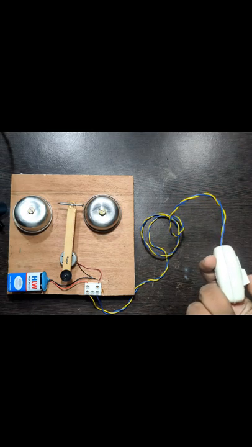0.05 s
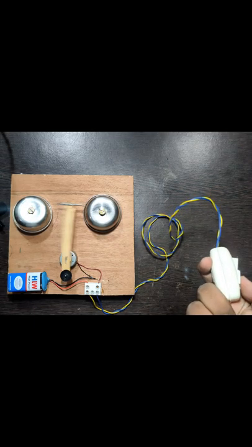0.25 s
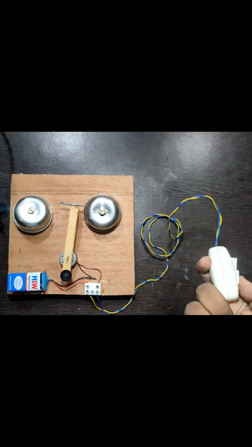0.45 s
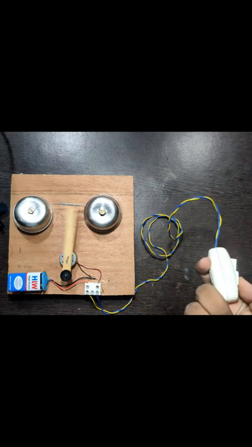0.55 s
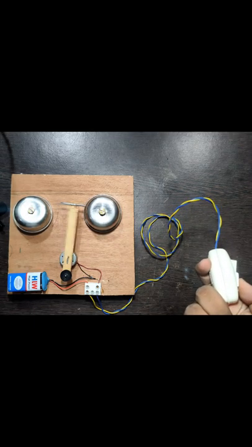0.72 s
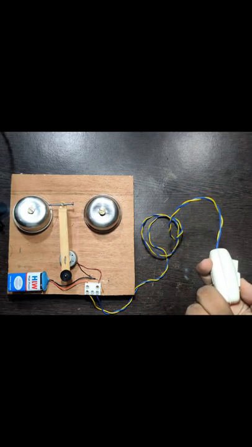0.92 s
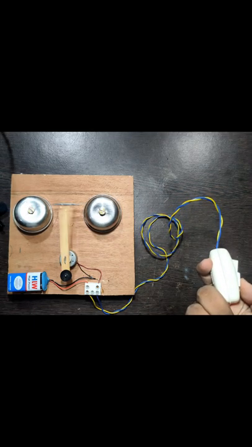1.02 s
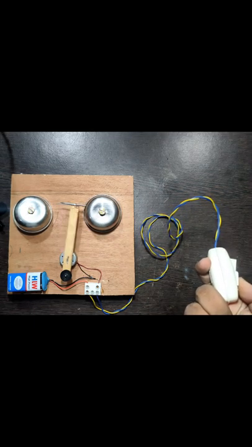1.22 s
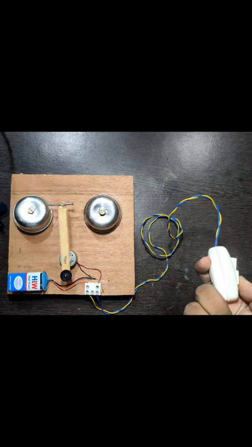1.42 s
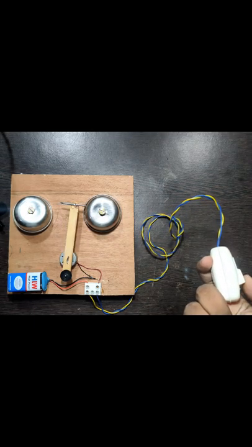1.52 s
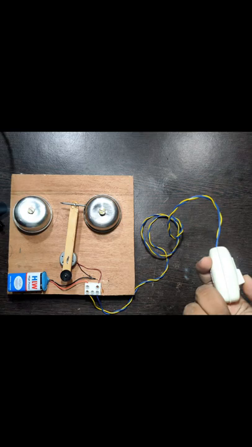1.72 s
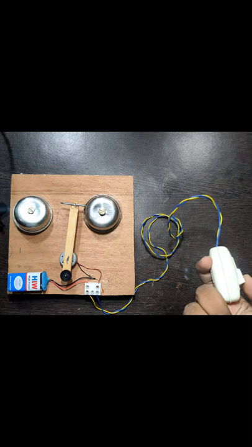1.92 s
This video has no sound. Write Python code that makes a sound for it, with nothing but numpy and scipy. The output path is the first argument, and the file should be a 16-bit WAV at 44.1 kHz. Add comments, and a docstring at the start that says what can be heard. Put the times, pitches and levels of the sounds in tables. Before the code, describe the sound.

A small motor-driven bell rattles rapidly on two steel domes between two switch clicks.

```python
"""Home-made electric bell

A switch clicks on and a small motor throws a wooden arm to and fro about twelve times a second.
Its wire tip clatters on two steel bells in turn while the loose arm knocks and rattles and the
wooden board bumps on the table. The switch clicks off. Heard close by in a small room."""
import sys
import numpy as np
from scipy import signal
from scipy.fft import rfft, irfft
from scipy.io import wavfile
from scipy.ndimage import uniform_filter1d

SR = 44100
rng = np.random.default_rng(int(sys.argv[2]) if len(sys.argv) > 2 else 0)


def dump_mix(stems):
    """Bounce the given channels to the path in sys.argv[1] as a 16-bit WAV at rate SR."""
    frames = np.atleast_2d(stems).T  # one column per channel
    limited = np.clip(frames, -1, 1)  # hard clip at full scale
    pcm = np.round(limited * 32767).astype(np.int16)
    wavfile.write(sys.argv[1], SR, pcm)


N = 85995
TIME_S = np.arange(N) / SR
BIN_HZ = np.fft.rfftfreq(2 * N, 1 / SR)


def amp(db):
    """Decibels to gain."""
    return 10 ** (np.asarray(db) / 20)


def unit(x):
    """Scales each channel to unit energy."""
    return x / np.sqrt(np.sum(x ** 2, -1, keepdims=True) + 1e-20)


def read(points, hz):
    """Interpolates a table on a log-frequency axis."""
    freq_hz, value = np.transpose(points)
    return np.interp(np.log(hz + 1), np.log(freq_hz + 1), value)


def add(mix, start_s, sound):
    """Mixes a sound in at start_s."""
    part = mix[..., round(start_s * SR):][..., :sound.shape[-1]]
    part += sound[..., :part.shape[-1]]


def convolve(x, response):
    """Convolves per channel, cut to N samples."""
    return signal.fftconvolve(np.atleast_2d(x), np.atleast_2d(response), axes=1)[:, :N]


def butter(x, order, cutoff_hz, kind):
    """Butterworth filter."""
    return signal.sosfilt(signal.butter(order, cutoff_hz, kind, fs=SR, output="sos"), x)


def colour(points, size=4096):
    """Causal unit-energy response with the given spectrum."""
    log_gain = np.log(amp(read(points, abs(np.fft.fftfreq(size, 1 / SR)))))
    spectrum = np.exp(np.conj(signal.hilbert(log_gain)))
    return unit(np.fft.ifft(spectrum).real[:size // 2])


def ring(modes):
    """Decaying partials, each with its own phase left and right."""
    t = np.arange(SR) / SR
    out = np.zeros((2, SR))
    for hz, level_db, t60_s in modes:
        phase = rng.normal(0, 0.75, (2, 1)) * min(hz / 4000, 2)
        energy_norm = np.sqrt(4 * np.log(1000) / (t60_s * SR))
        out += amp(level_db - 60 * t / t60_s) * energy_norm * np.sin(2 * np.pi * hz * t + phase)
    return out


def sparse_noise(shape, density):
    """Random impulses on a fraction of the samples."""
    return rng.standard_normal(shape) * (rng.random(shape) < density)


def burst(decay_s, density=1, size=3000):
    """Decaying spray of tiny contacts."""
    return unit(sparse_noise(size, density) * np.exp(-np.arange(size) / SR / decay_s))


# freq_hz, level_db, t60_s
WIRE_MODES = [(8100, -4, .008), (10700, -2, .009), (13400, 2, .01)]
BOUNCE_S, CHATTER_S = 0.0024, 0.0018
WIRE_DB, SPOT_SPREAD_DB = -9, 2


def bell(blows, crack_colour, modes, crack_db, ring_db, contact_s, bounce_db, chatter_db):
    """Wire hits, bounces and chatters on a tightly screwed bell; each spot rings differently."""
    force, spots = np.zeros((2, N)), np.zeros((4, N))
    for start_s, level_db in blows:
        rebound_s = start_s + BOUNCE_S * rng.uniform(0.92, 1.08)
        add(spots[rng.integers(len(spots))], rng.uniform(start_s, rebound_s), amp([level_db]))
        for side in force:
            add(side, start_s, amp(level_db) * burst(contact_s))
            add(side, rebound_s, amp(level_db + bounce_db) * burst(contact_s))
            add(side, start_s, amp(level_db + chatter_db) * burst(CHATTER_S, density=0.055))
    cracks = convolve(force, colour(crack_colour)) + amp(WIRE_DB) * convolve(force, ring(WIRE_MODES))
    tone = np.zeros((2, N))
    for impulses in spots:
        spot_modes = [(hz, db + rng.normal(0, SPOT_SPREAD_DB), t60_s) for hz, db, t60_s in modes]
        tone += convolve(impulses, ring(spot_modes))
    return amp(crack_db) * cracks, amp(ring_db) * tone


# start_s, level_db
FIRST_BLOWS = [(0.2904, -10.5), (0.3334, -7.5), (0.412, -2.5), (0.5059, -5), (.592, -6.5), (0.675, -2.5),
               (.767, -6), (0.8506, -4), (0.9358, -7.5), (1.016, -3), (1.105, -8), (1.1877, -4.5),
               (1.273, -3), (1.359, -6.5), (1.439, -3), (1.522, -5.5)]
# wire on steel: freq_hz, level_db
FIRST_CRACK_COLOUR = [(300, -22), (1070, -6), (1200, 1), (2050, 4.5), (2550, 2), (3300, 2.5), (4150, 0),
                      (4900, 6), (6100, -2.5), (7300, -1), (8000, 6), (9000, 1), (9900, -18), (10750, 6),
                      (11750, -20), (12200, -36), (12700, -2), (13400, 5.5), (14400, -22), (15200, -50),
                      (16000, -16.5)]
# freq_hz, level_db, t60_s
FIRST_MODES = [(1883, -4, .16), (2543, -12, .2), (3021, -4, .2), (4932, -12, .13), (5469, -8, .15),
               (6196, -14, .16), (6815, -14, .16), (7949, -6, .14), (9911, -16, .16), (10562, -9, .1),
               (10707, -4, .11), (13222, -6, .12), (13378, 0, .2), (13927, -10, .12), (14438, -18, .12)]


def first_bell():
    """Forward swing: short contact, strong bounce. Returns cracks and ring."""
    return bell(FIRST_BLOWS, FIRST_CRACK_COLOUR, FIRST_MODES, crack_db=-2, ring_db=-9,
                contact_s=0.00094, bounce_db=1, chatter_db=-4)


def ting(gain_db=-3, growth=2.9, decay_s=0.0008):
    """Sharp edge of hit and bounce on the first bell; harder blows are brighter."""
    out = np.zeros((2, N))
    for start_s, level_db in FIRST_BLOWS:
        for hit_s in (start_s, start_s + BOUNCE_S):
            add(out, hit_s, amp(gain_db + growth * level_db) * np.array([burst(decay_s), burst(decay_s)]))
    return butter(out, 1, 12000, "high")


def hum(pitch_hz=1167, t60_s=0.95, rms_db=-50.5):
    """The first bell's lowest partial, topped up by every blow, lingers after the last."""
    power = sum((TIME_S > start_s) * amp(level_db - 60 * abs(TIME_S - start_s) / t60_s) ** 2
                for start_s, level_db in FIRST_BLOWS)
    envelope = np.sqrt(abs(uniform_filter1d(power, 200)))
    return amp(rms_db) * np.sqrt(N) * unit(envelope * np.sin(2 * np.pi * pitch_hz * TIME_S))


# start_s, level_db
SECOND_BLOWS = [(.369, -5), (.461, -1), (.5465, -2.5), (.632, -3), (.719, -1.5), (.809, -2.5), (.890, -1),
                (.975, -5), (1.0587, 1), (1.148, -3.5), (1.229, -2), (1.3125, 0), (1.396, -4.5),
                (1.478, -2.5), (1.562, -4)]
# wire on steel: freq_hz, level_db
SECOND_CRACK_COLOUR = [(300, -22), (1070, -9), (1200, -7), (2050, 4.5), (2550, 6), (3300, 7.5),
                       (4150, -9.5), (5400, 8.5), (6300, -0.5), (7300, -5.5), (8200, 0.5), (9300, 6),
                       (10200, -1), (10900, 6), (12000, -52), (13400, 11.5), (14300, 0), (15200, -38),
                       (16000, -17)]
# freq_hz, level_db, t60_s
SECOND_MODES = [(1255, -11, .2), (3677, -9, .35), (4732, -8, .22), (8336, -8, .16), (9162, -12, .18),
                (13438, 0, .22), (13554, -6, .12)]


def second_bell():
    """Back swing: longer contact, weaker bounce. Returns cracks and ring."""
    return bell(SECOND_BLOWS, SECOND_CRACK_COLOUR, SECOND_MODES, crack_db=-5.5, ring_db=-11,
                contact_s=0.0019, bounce_db=-5.5, chatter_db=-3.5)


# arm rebounds: time_s, level_db
KNOCKS = [(0.305, -15), (.338, 4), (0.361, -4.5), (.425, -0.5), (.461, -8.5), (0.514, 0), (.543, -1),
          (0.6, 0), (0.612, -17), (0.638, 0), (.685, -0.5), (0.714, -10), (0.729, -16), (0.774, 2.5),
          (.80, -4), (.812, -7.5), (0.861, 1.5), (0.886, -4), (0.941, 6.5), (0.965, 0), (1.024, 3),
          (1.062, -4), (1.113, 3.5), (1.122, -4), (1.136, 0.5), (1.155, -2.5), (1.197, 3.5), (1.228, -0.5),
          (1.237, -10), (1.279, 1.5), (1.308, -1.5), (1.366, 4.5), (1.389, 1), (1.449, 3.5), (1.474, 0),
          (1.53, 4.5), (1.556, -4), (1.569, -3)]
# arm and board resonances: freq_hz
ARM_MODE_HZ = [1175, 1255, 1413, 1498, 1607, 1750, 1884, 1975, 2158, 3005, 3500]
# same order: level_db, t60_s
ARM_MODE_DECAYS = [(-18, 0.088), (-1, 0.061), (-0.5, 0.022), (-3, 0.023), (-6.5, 0.016), (-5, 0.027),
                   (0, 0.039), (0, 0.033), (-10.5, 0.071), (-5.5, 0.031), (-5.5, 0.017)]
KNOCK_LEAD_S, KNOCK_RISE_S, KNOCK_DAMPING_S = 0.003017, 0.0056, 0.0077


def arm(knock_db=-5, spread_db=5.5, rattle_db=-47, rattles_per_s=510):
    """The loose arm knocks after the blows and rattles between; each knock rings differently."""
    modes = np.column_stack([ARM_MODE_HZ, ARM_MODE_DECAYS])
    contacts = unit(sparse_noise(N, rattles_per_s / SR)) * np.sqrt(N)
    out = convolve(amp(rattle_db) * contacts * rattle_envelope(), ring(modes))
    t = np.arange(4000) / SR
    hz, mode_db, t60_s = modes.T[:, :, None]
    swell = (1 - np.exp(-(t / KNOCK_RISE_S) ** 2)) * np.exp(-t / KNOCK_DAMPING_S)
    for time_s, level_db in KNOCKS:
        jitter_db, phase = rng.normal(0, spread_db, hz.shape), rng.random(hz.shape)
        partials = amp(mode_db + jitter_db - 60 * t / t60_s) * np.sin(2 * np.pi * (hz * t + phase))
        add(out, time_s - KNOCK_LEAD_S, amp(knock_db + level_db) * unit(swell * partials.sum(0)))
    return butter(out, 6, 1100, "high")


# start_s, level_db, pitch_hz, snap_db, left_minus_right_db, case_db, peak_s
SWITCH_CLICKS = [(0.2425, -8, 2960, -13, -1, -20, 0.00065), (1.6031, -3, 3380, -5, 5, -41, 0.00065)]
# freq_hz, level_db
SNAP_COLOUR = [(300, -13), (1400, -8), (2200, -21), (3000, 7), (3700, 0), (4400, 7), (5400, -18),
               (6500, 3.5), (7500, -8.5), (8500, 10), (9800, -6), (11000, 2.5), (12500, -10), (13800, -13),
               (15500, 3)]


def switch(gain_db=6, right_lead_s=0.0003, snap_s=0.00075, case_hz=1444, case_t60_s=0.015):
    """The rocker snaps over: a few cycles of its plastic case and a bright crack that fills the room."""
    near, bright = np.zeros((2, N)), np.zeros((2, N))
    t = np.arange(3000) / SR
    for start_s, level_db, pitch_hz, snap_db, pan_db, case_db, peak_s in SWITCH_CLICKS:
        gain = amp(gain_db + level_db + np.array([[pan_db], [-pan_db]]) / 2)
        click = unit((t / peak_s) ** 3 * np.exp(-3 * t / peak_s) * np.sin(2 * np.pi * pitch_hz * t))
        add(near[0], start_s, gain[0] * click)
        add(near[1], start_s - right_lead_s, gain[1] * click)
        snap = unit(convolve([burst(snap_s), burst(snap_s)], colour(SNAP_COLOUR)))
        add(bright, start_s, gain * amp(snap_db) * snap)
        add(bright, start_s, gain * ring([(case_hz, case_db, case_t60_s)]))
    clicks = room(near, tail_db=-5, early_db=-10, echo_db=-14)
    return clicks + room(bright, tail_db=3, early_db=3.5, echo_db=1.5)


# freq_hz, level_db
SCRAPE_COLOUR = [(200, -50), (1080, -18), (1180, 9), (1950, 11.5), (2450, 2.5), (3550, 7.5), (4150, -39),
                 (5300, 8.5), (7300, 2.5), (8100, 11), (9800, -2.5), (10800, -9), (12000, -41), (13400, 14),
                 (14400, 16), (16000, -48)]
# freq_hz, level_db
RUMBLE_COLOUR = [(25, -21), (70, -18), (130, -7), (190, -1), (280, -1.5), (420, 0.5), (700, -2), (1000, -6),
                 (1600, -4), (4000, -62)]


def motor(scrape_db=-40, rumble_db=-45.5):
    """Motor and pivot scrape grittily; the board rumbles beneath."""
    grit = sparse_noise((4, N), 0.06)  # left, right, two shared
    scrape = unit(convolve(grit[:2] + 0.5 * grit[2], colour(SCRAPE_COLOUR))) * rattle_envelope()
    rumble = unit(convolve(0.33 * grit[:2] + grit[3], colour(RUMBLE_COLOUR))) * motor_speed()
    return np.sqrt(N) * (amp(scrape_db) * scrape + amp(rumble_db) * rumble)


def motor_speed(on_s=0.286, off_s=1.575, spin_s=0.0064, coast_s=0.0046):
    """Spins up, holds at 1, coasts to rest."""
    return np.clip((TIME_S - on_s) / spin_s, 0, 1) * np.exp(-np.maximum(TIME_S - off_s, 0) / coast_s)


def rattle_envelope(lull_db=-11.5, lead_s=0.014, width_s=0.0077):
    """The running mechanism falls quiet as the arm flies toward the first bell."""
    flight = sum(np.exp(-((TIME_S - start_s + lead_s) / width_s) ** 2) for start_s, _ in FIRST_BLOWS)
    return motor_speed() * amp(lull_db * flight)


# start_s, level_db
BUMPS = [(0.661, 1), (0.869, -1), (0.924, 5), (1.042, 3), (1.227, 11.5)]


def bumps(gain_db=-30):
    """The shaking board bumps softly on the table."""
    out = np.zeros(N)
    for start_s, level_db in BUMPS:
        thud = unit(butter(burst(decay_s=0.011), 3, 110, "low"))
        add(out, start_s, amp(gain_db + level_db) * thud)
    return out


# freq_hz, level_db
AIR_COLOUR = [(15, -81.5), (25, -41), (141, -14.5), (195, -6), (236, -14.5), (277, -12.5), (489, -6.5),
              (531, -7.5), (641, -12.5), (863, -11.5), (1370, -20), (1480, -18), (4140, -37), (14400, -44),
              (16000, -51)]
# freq_hz, left_right_correlation
AIR_CORRELATION = [(50, 0.45), (200, 0.89), (600, 0.4), (2000, 0.083), (10000, 0.08)]
# time_s, level_db
AIR_LEVEL = [(0, -49), (.25, -49.5), (1.598, -48.5), (1.95, -47.5)]


def air():
    """Steady low rush of the room."""
    left, independent = rfft(rng.standard_normal((2, 2 * N)))
    correlation = np.clip(read(AIR_CORRELATION, BIN_HZ), 0, 1)
    right = correlation * left + np.sqrt(1 - correlation ** 2) * independent
    noise = irfft(np.array([left, right]) * amp(read(AIR_COLOUR, BIN_HZ)))[:, :N]
    return unit(noise) * np.sqrt(N) * amp(np.interp(TIME_S, *np.transpose(AIR_LEVEL)))


# freq_hz, t60_s
ROOM_DECAY = [(200, 0.28), (1500, 0.38), (4000, 0.34), (8000, 0.36), (14000, 0.32)]
EARLY_S, ECHO_S, ECHO_SPREAD_S, TAIL_RISE_S = 0.0014, 0.0055, 0.0018, 0.0068


def room(x, tail_db, early_db, echo_db, size=22050):
    """Direct sound, early reflections off board and table, a near-wall echo and the room's tail."""
    t = np.arange(size) / SR
    taps = rng.choice([-1., 1.], (2, size)) * (rng.random((2, size)) < 0.15)
    onset = np.clip(t / TAIL_RISE_S - 0.5, 0, 1)
    hz, frame_s, spectra = signal.stft(taps * onset, SR, nperseg=256)
    decay = amp(-60 * frame_s / read(ROOM_DECAY, hz)[:, None])
    tail = signal.istft(spectra * decay, SR, nperseg=256)[1][:, :size]
    scatter = sparse_noise((2, size), 0.1)
    early = scatter * np.exp(-t / EARLY_S)
    echo = scatter[::-1] * np.exp(-((t - ECHO_S) / ECHO_SPREAD_S) ** 2)
    response = amp(tail_db) * unit(tail) + amp(early_db) * unit(early) + amp(echo_db) * unit(echo)
    return x + convolve(x, response)


# freq_hz, left_minus_right_db
MACHINE_BALANCE = [(200, 1.5), (1100, 0.5), (1800, 3), (2800, -2), (4200, 1.5), (6400, 1.5), (8200, 11),
                   (10500, 5.5), (13400, 5.5), (16000, -7)]


def scene():
    """Bells and mechanism to the left, the switch in the hand, all in one room."""
    first_cracks, first_ring = first_bell()
    second_cracks, second_ring = second_bell()
    machine = room(first_cracks + second_cracks + ting(), tail_db=-4, early_db=-9, echo_db=-11)
    machine += room(arm(), tail_db=-9.5, early_db=-10, echo_db=-21.5)
    machine += motor() + hum()
    machine += room(first_ring + second_ring, tail_db=-7, early_db=-2.5, echo_db=-20.5)
    balance = amp(np.array([[0.5], [-0.5]]) * read(MACHINE_BALANCE, BIN_HZ))
    placed = irfft(rfft(machine, 2 * N) * balance)[:, :N]
    return placed + switch() + bumps() + air()


def record(dry, cutoff_hz=15700):
    """Steep low-pass band limit."""
    lowpass = signal.firwin(511, cutoff_hz, window=("kaiser", 9), fs=SR)
    return signal.oaconvolve(dry, lowpass[None], "same")


dry = scene()
out = record(dry)
dump_mix(out)
```